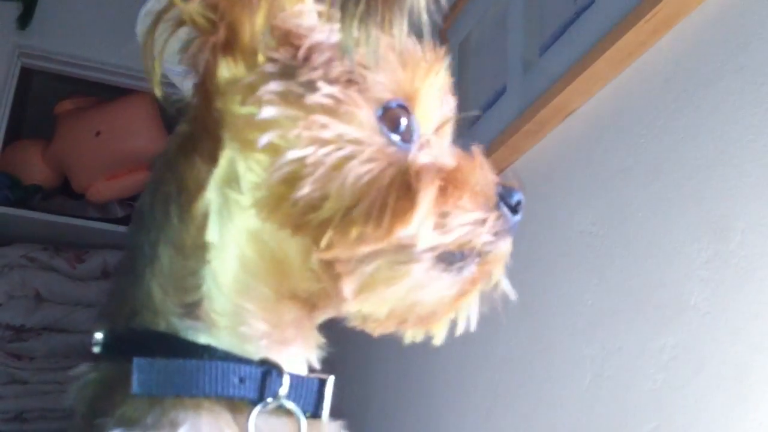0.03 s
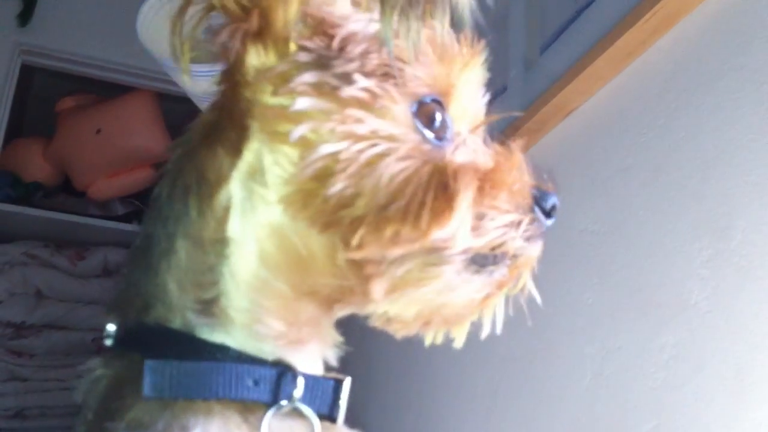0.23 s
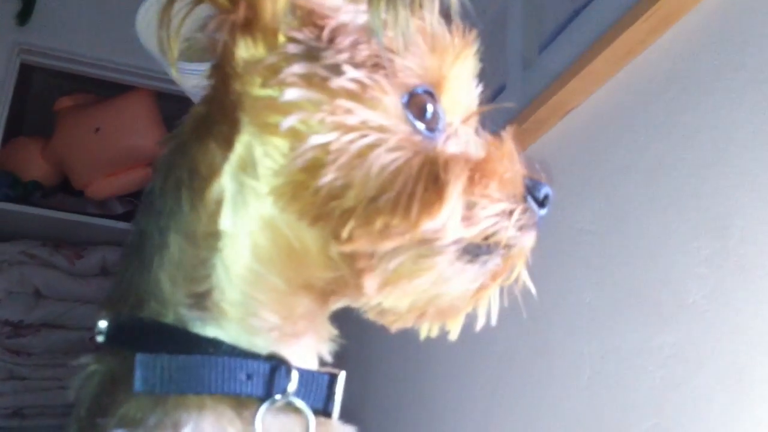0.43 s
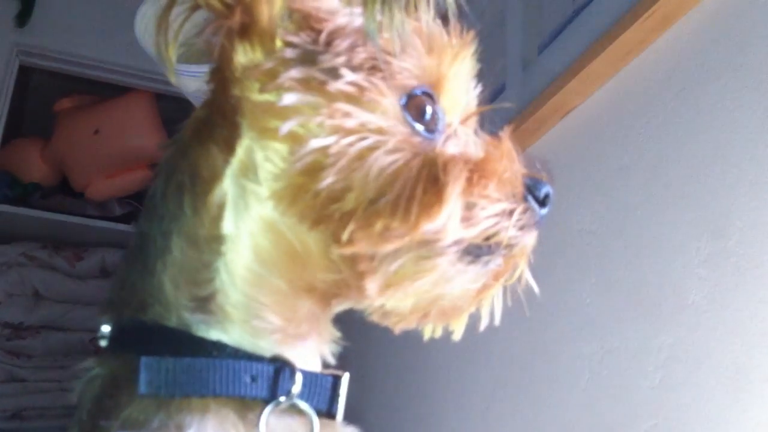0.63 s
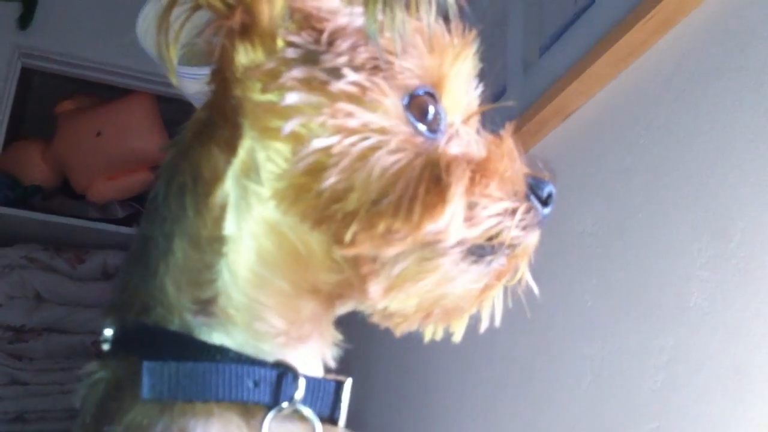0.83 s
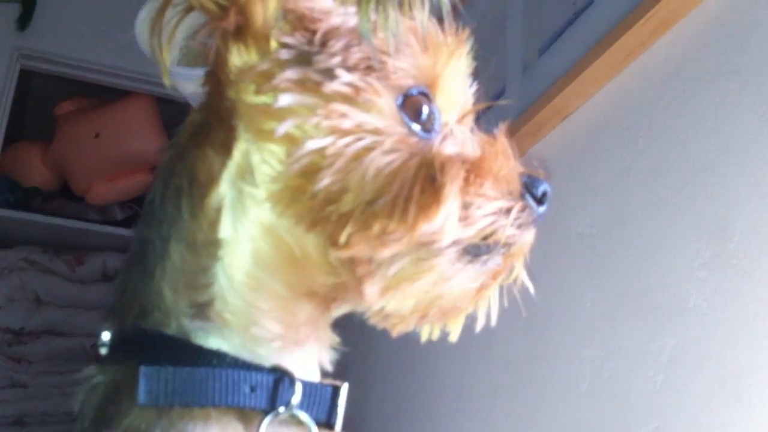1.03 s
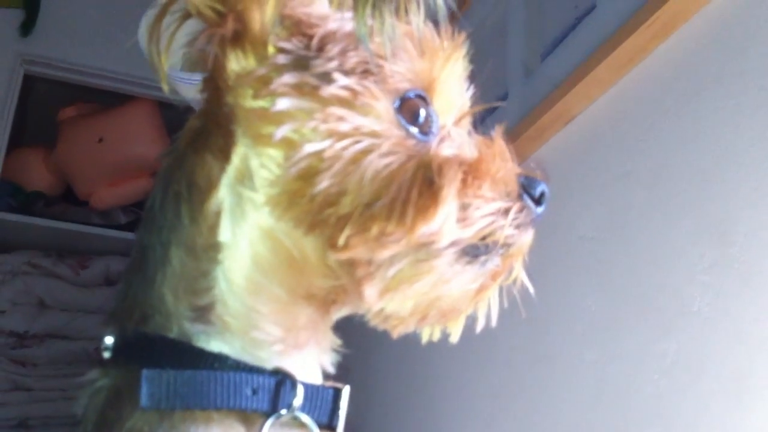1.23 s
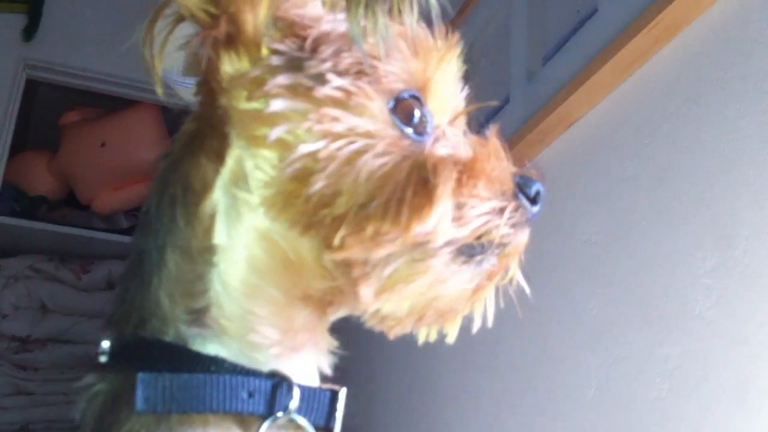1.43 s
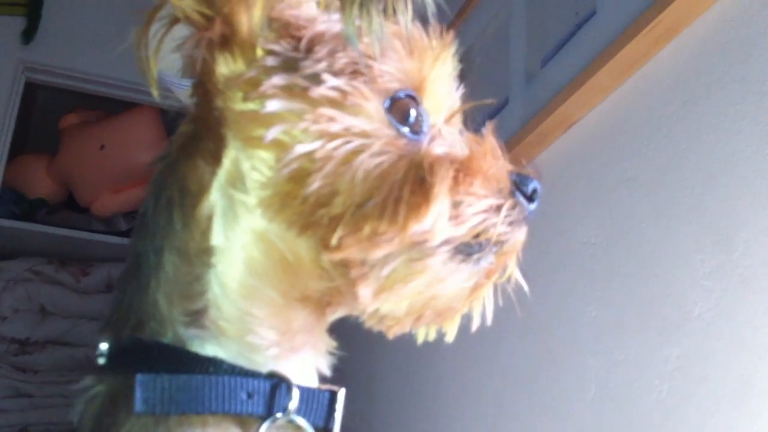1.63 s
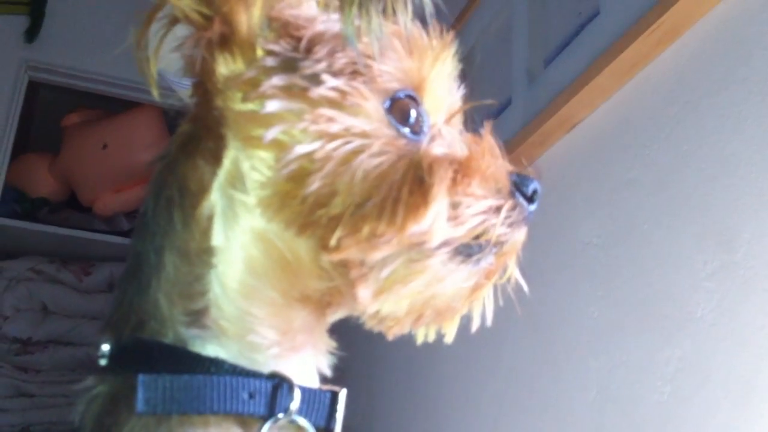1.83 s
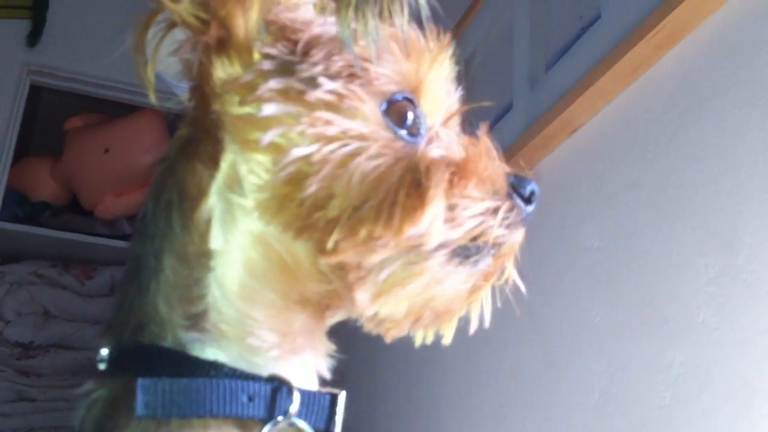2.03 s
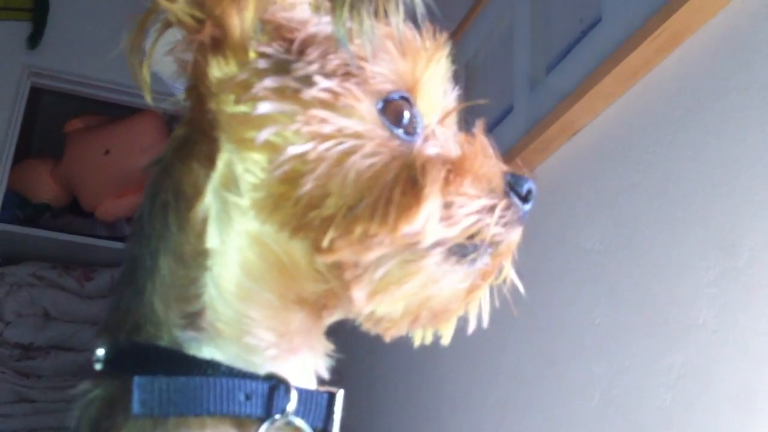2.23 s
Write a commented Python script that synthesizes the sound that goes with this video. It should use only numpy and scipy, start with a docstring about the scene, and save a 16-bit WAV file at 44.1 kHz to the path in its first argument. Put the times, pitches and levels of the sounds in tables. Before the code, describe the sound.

A small dog gives one short, gruff bark with a snort through the nose, then trails off into a weak, fluttering growl. The microphone is close, in a quiet room with faint hiss.

```python
"""A small dog gives one gruff bark through a nearly closed mouth and trails off into a low growl.
The bark's pitch leaps up, then collapses into rough single pulses while air snorts through the nose.
In the growl the throat flutters about 27 times a second: each flutter kicks the pitch up and lets it sag.
One microphone, close to the dog, in a quiet furnished room with a low rush of air and faint hiss."""
import sys
import numpy as np
from scipy import signal
from scipy.fft import rfft, irfft
from scipy.io import wavfile
from scipy.ndimage import uniform_filter1d

SR = 44100
rng = np.random.default_rng(int(sys.argv[2]) if len(sys.argv) > 2 else 0)


def output_pcm(signal):
    """Save a mono or channel-first signal as 16-bit PCM at the path in sys.argv[1].

    Samples are clipped to [-1, 1] before scaling.
    """
    pcm = np.clip(np.atleast_2d(signal).T, -1, 1) * 32767
    wavfile.write(sys.argv[1], SR, np.round(pcm).astype(np.int16))


N = 101429

# Drive of the vocal folds through the bark: time_s, level_db, roughness (0-1)
BARK_DRIVE = [(.2015, -5, 0.03), (.207, -39, 0), (.22, -28, 0.01), (.236, -25, 0.14), (.25, -30, 0.15),
              (.26, -30, 0.34), (.282, -37, 0.35), (.286, -74, 0.2), (.291, -32, 0.42), (.31, -34, 0.15),
              (.319, -47, 0.3)]
# Throat flutters of the growl: start_s, top_pitch_hz, sagged_pitch_hz, level_db, overtones_db
GROWL_FLUTTERS = [(.316, 290.1, 228, -34.5, -3), (.35, 271.2, 199, -31.5, -3.5),
                  (.387, 250.7, 206.7, -43.5, 8), (.423, 249.5, 181.4, -42.5, 2),
                  (.461, 242.7, 185.5, -47.5, 2), (.501, 238.2, 181.6, -48, -3),
                  (.533, 227.5, 187.5, -56.5, -3), (.574, 281.7, 178.2, -45.5, 3),
                  (.612, 266.3, 175.3, -45, 3), (.649, 269.8, 186.5, -46.5, 3),
                  (.686, 293, 192.8, -42, 3.5), (.722, 279, 198.9, -38, 0.5),
                  (.759, 285.2, 189, -39.5, -0.5), (.798, 257.2, 178.5, -40.5, 0.5),
                  (.841, 221.4, 181.8, -51.5, 0)]
# Spectrum of air blown through the nose: frequency_hz, gain_db
NOSE_SPECTRUM = [(1500, 8.5), (3000, 0), (4000, -14), (4500, 2), (4900, 9.5), (5600, -5.5), (6600, -11),
                 (7600, -1), (8500, 3), (9600, -9), (10200, 6.5), (11200, 2.5), (12600, 6), (14500, -4.5),
                 (17000, -6)]
GROWL_END_S = .872


def undb(db):
    """Decibels to gain."""
    return 10 ** (np.asarray(db) / 20)


def curve(rows, column=1):
    """One column of a table, joined by straight lines in time."""
    rows = np.array(rows)
    return np.interp(np.arange(N) / SR, rows[:, 0], rows[:, column])


def envelope(rows, fade_s=.003):
    """Gain from a level table, faded in and out at its ends."""
    t = np.arange(N) / SR
    inside_s = np.minimum(t - rows[0][0], rows[-1][0] - t)
    return undb(curve(rows)) * np.clip(inside_s / fade_s, 0, 1)


def colour(x, points, size=4096):
    """Minimum-phase filter through (frequency_hz, gain_db) points."""
    hz, db = np.array(points).T
    bins_hz = np.maximum(np.fft.rfftfreq(size, 1 / SR), 1)
    gain = undb(np.interp(np.log(bins_hz), np.log(hz), db))
    cepstrum = irfft(np.log(gain))
    cepstrum[1:size // 2] *= 2
    cepstrum[size // 2 + 1:] = 0
    impulse = irfft(np.exp(rfft(cepstrum)))
    return signal.fftconvolve(x, impulse)[:N]


def unit(x):
    """Scale to rms 1."""
    return x / np.std(x)


def noise(points):
    """Coloured noise of rms 1."""
    return unit(colour(rng.standard_normal(N), points))


def wander(rate_hz):
    """Smooth random motion of spread 1, new about rate_hz times a second."""
    width = max(int(SR / rate_hz), 1)
    return unit(uniform_filter1d(uniform_filter1d(rng.standard_normal(N), width), width))


def room_tone(level_db=-65.5):
    """A steady low rush of air and faint hiss."""
    # Spectrum of the quiet room: frequency_hz, gain_db
    air_spectrum = [(20, -27), (60, -18), (95, -20.5), (115, -2.5), (150, -0.5), (215, -7), (330, -8.5),
                    (750, -13), (1100, -15), (2900, -19), (8000, -21.5), (17000, -22.5)]
    return undb(level_db) * noise(air_spectrum)


def room(direct, tail_db=-22, t60_s=.96, delay_s=.002):
    """The furnished room adds a short, faint tail behind the close sound."""
    t = np.arange(SR // 2) / SR
    tail = rng.standard_normal(len(t)) * np.exp(-np.log(1000) * t / t60_s) * (t > delay_s)
    return direct + undb(tail_db) * signal.fftconvolve(direct, tail / np.linalg.norm(tail))[:N]


def snort(peak_s=.2625, peak_db=-48.5, rise_db_per_s=302, fall_db_per_s=193):
    """A puff of air swells and fades in the nose."""
    from_peak_s = np.arange(N) / SR - peak_s
    drop_db = np.maximum(-from_peak_s * rise_db_per_s, from_peak_s * fall_db_per_s)
    return undb(peak_db - drop_db) * noise(NOSE_SPECTRUM)


def lip_tick(start_s=.194, level_db=-51.5, decay_s=.0012):
    """The lips part with a tiny bright tick."""
    age_s = np.arange(N) / SR - start_s
    decay = (age_s > 0) * np.exp(-np.abs(age_s) / decay_s)
    return undb(level_db) * decay * noise([(3000, -15), (6000, 0), (12000, -18)])


def vocal_folds(pitch_hz, roughness, tilt_db, jitter=.12, shimmer_db=3):
    """Uneven pulses: the fundamental, overtones stepping by tilt_db, and the gate they put on the air."""
    started = np.arange(N) / SR > BARK_DRIVE[0][0]
    uneven_hz = pitch_hz * (1 + jitter * roughness * wander(274))
    phase = 2 * np.pi * np.cumsum(uneven_hz * started) / SR
    strength = undb(shimmer_db * roughness * wander(580))
    overtones = sum(undb(tilt_db * (k - 1.5)) * np.cos(k * phase) for k in range(2, 16))
    opening = np.exp(1.8 * np.cos(phase))
    air_gate = opening / np.sqrt(np.mean(opening ** 2))
    return strength * np.cos(phase), strength * overtones, air_gate


def throat_slack(hold_s=.008, slacken_s=.016, tighten_s=.005):
    """How slack the throat is: 0 just after each kick of the flutter, 1 before the next."""
    starts = [row[0] for row in GROWL_FLUTTERS]
    rows = []
    for start, end in zip(starts, starts[1:]):
        rows += [(start, 0), (start + hold_s, 0), (start + hold_s + slacken_s, 1), (end - tighten_s, 1)]
    return curve(rows + [(starts[-1], 0), (GROWL_END_S, .5)])


def growl(kick_s=.00955, hold_s=.0042, release_s=.011, dip_delay_s=.0051, dip_width_s=.0039):
    """Each flutter kicks the pitch up; as the throat slackens the pitch sags and the tone dulls."""
    # Resonances of the growling throat: frequency_hz, gain_db
    throat = [(70, -33), (150, 3.5), (205, 2.5), (270, -4.5), (350, 3.5), (450, -12), (560, -3.5),
              (700, -9), (820, -21), (950, -51), (1600, -29), (2200, -53), (4000, -42.5)]
    # Spectrum of the breath in the growl: frequency_hz, gain_db
    breath_spectrum = [(100, -20), (300, -8.5), (700, 14.5), (950, -10), (1300, 12), (1700, -31),
                       (2200, -53), (5000, -14)]
    t = np.arange(N) / SR
    starts = [row[0] for row in GROWL_FLUTTERS]
    pitch = []
    for (start, top_hz, sagged_hz, _, _), end in zip(GROWL_FLUTTERS, [*starts[1:], GROWL_END_S]):
        pitch += [(start, top_hz), (start + hold_s, top_hz), (end - kick_s, sagged_hz)]
    fade_in = np.clip((t - starts[0]) / kick_s + 1, 0, 1)
    fade_out = np.clip(1 - (t - GROWL_END_S) / release_s, 0, 1)
    effort = undb(curve(GROWL_FLUTTERS, column=3)) * fade_in * fade_out
    fundamental, overtones, air_gate = vocal_folds(curve(pitch), .2, tilt_db=-8 * throat_slack())
    # The fundamental dips briefly just after each kick.
    dips = sum(np.exp(-.5 * ((t - start - dip_delay_s) / dip_width_s) ** 2) for start in starts)
    fundamental *= undb(-4 * dips)
    overtones *= undb(curve(GROWL_FLUTTERS, column=4))
    voice = colour(np.sqrt(2) * effort * (fundamental + overtones), throat)
    breath = undb(-24) * air_gate * noise(breath_spectrum)
    nose_air = undb(-37) * noise(NOSE_SPECTRUM)
    return voice + effort * (breath + nose_air)


def bark(firm_at_s=.227, rasp_sag_db=-9.5):
    """Vocal pulses ring the throat; air rasps once a cycle and throbs as the flutter takes over."""
    # Leap and collapse of the voice: time_s, pitch_hz
    pitch = [(.203, 222.6), (.215, 222.3), (.219, 350.2), (.234, 315), (.25, 314), (.256, 249.8),
             (.268, 194), (.284, 143.5), (.294, 173.7), (.312, 152.6)]
    # Resonances of the barking throat: frequency_hz, gain_db
    throat = [(70, -40), (150, -13), (210, 2), (320, 1.5), (400, -3), (480, -0.5), (560, -4.5), (660, 1),
              (790, 2), (890, -28), (1150, -7.5), (1800, -42), (2200, -36), (4000, -51)]
    # Rasp of air at the vocal folds: time_s, level_db
    rasp_levels = [(.203, -41.5), (.215, -40.5), (.235, -35), (.25, -30), (.27, -37.5), (.3, -37.5),
                   (.33, -41), (.36, -45), (.43, -56.5), (.47, -78)]
    # Spectrum of that rasp: frequency_hz, gain_db
    rasp_spectrum = [(150, -24), (500, 4), (780, -4), (880, -7), (980, -2.5), (1250, -11), (1850, -12.5),
                     (2150, -32.5), (2700, -26), (3800, -56.5), (8000, -43)]
    pitch_hz = curve(pitch)
    # The bark starts dull and brightens as the folds close firmly.
    tilt_db = curve([(BARK_DRIVE[0][0], -4), (firm_at_s, 0)])
    roughness = curve(BARK_DRIVE, column=2)
    fundamental, overtones, air_gate = vocal_folds(pitch_hz, roughness, tilt_db)
    pulses = (fundamental + overtones) * np.sqrt(pitch_hz / 300)
    voice = colour(pulses * envelope(BARK_DRIVE), throat)
    pulsed_air = air_gate * rng.standard_normal(N)
    rasp = unit(colour(pulsed_air, rasp_spectrum)) * envelope(rasp_levels)
    return rasp * undb(rasp_sag_db * throat_slack()) - voice


def scene():
    """The dog close by, in mono, over the room tone."""
    # The microphone rolls off the bass below 130 Hz.
    low_cut = signal.butter(4, 130, "high", fs=SR, output="sos")
    dog = signal.sosfilt(low_cut, bark() + snort() + lip_tick() + growl())
    return (room(dog) + room_tone())[None]


def record(dry):
    """The recorder cuts the treble steeply above 17250 Hz."""
    return signal.sosfilt(signal.ellip(10, .2, 70, 17250, fs=SR, output="sos"), dry)


dry = scene()
out = record(dry)
output_pcm(out)
```